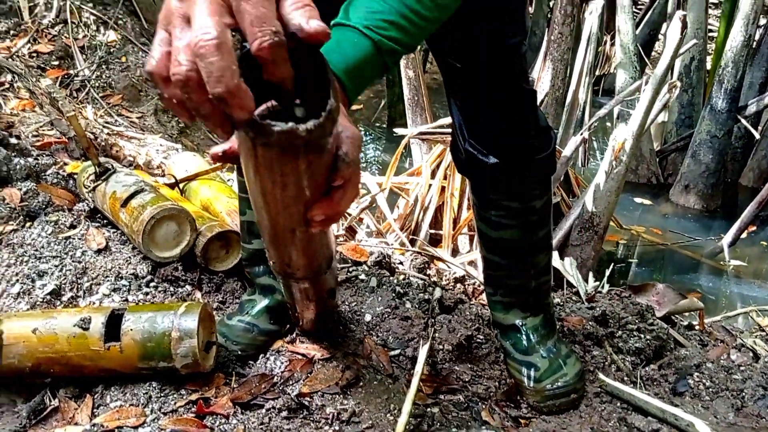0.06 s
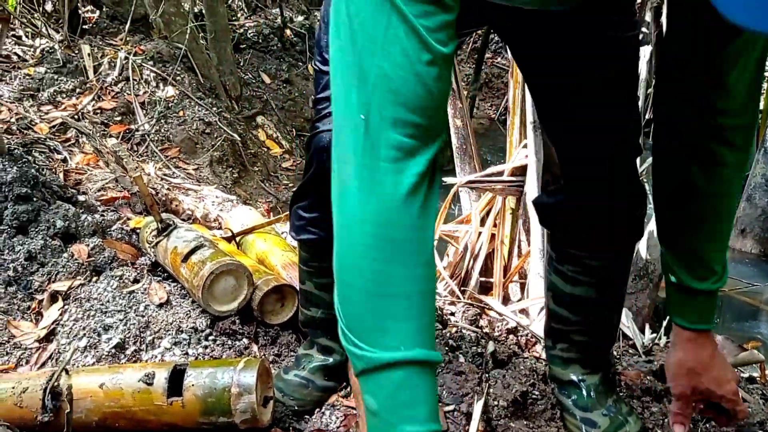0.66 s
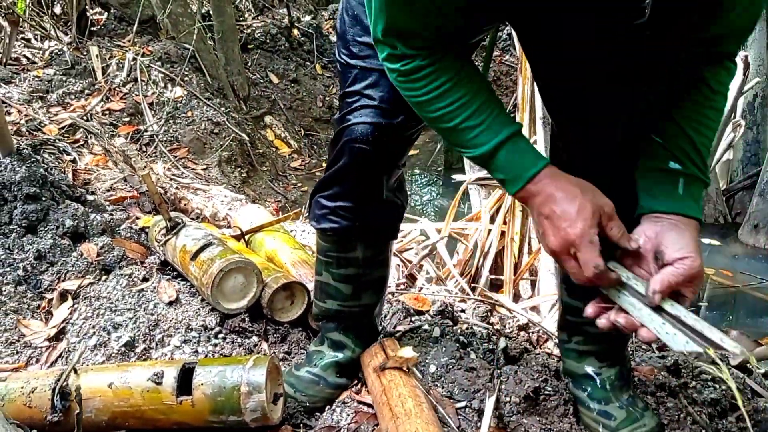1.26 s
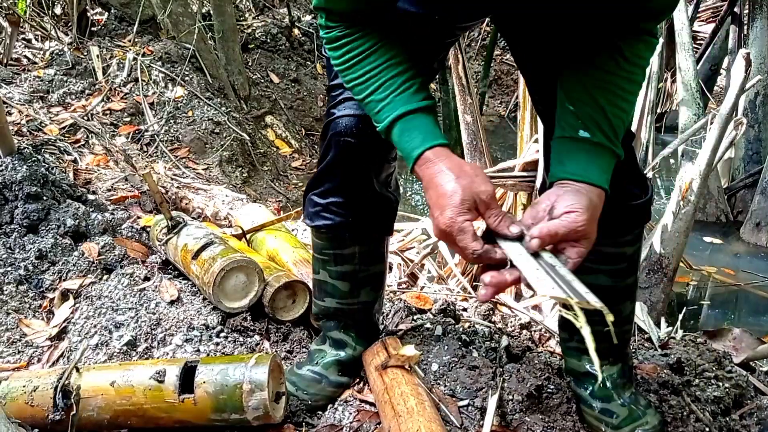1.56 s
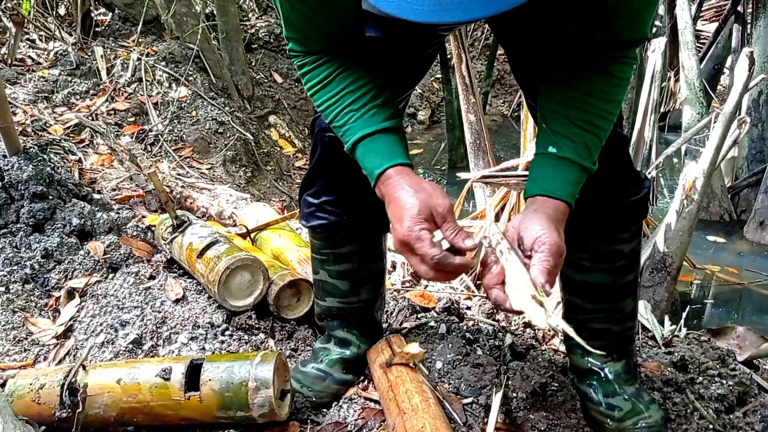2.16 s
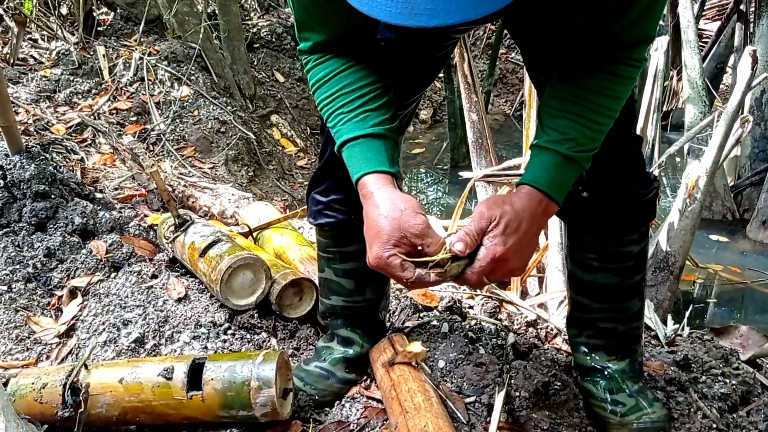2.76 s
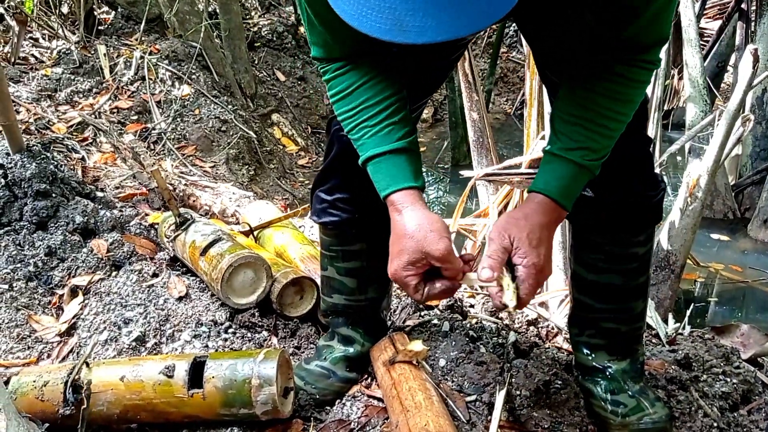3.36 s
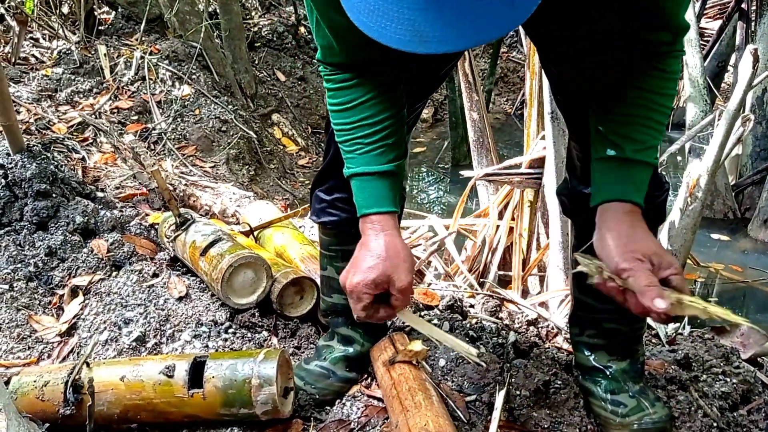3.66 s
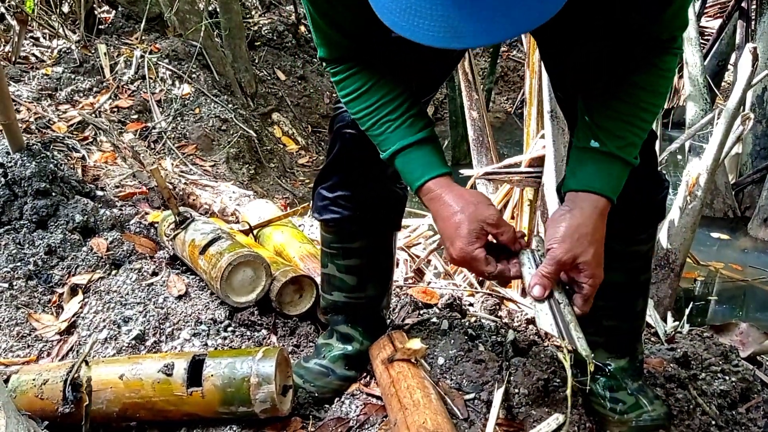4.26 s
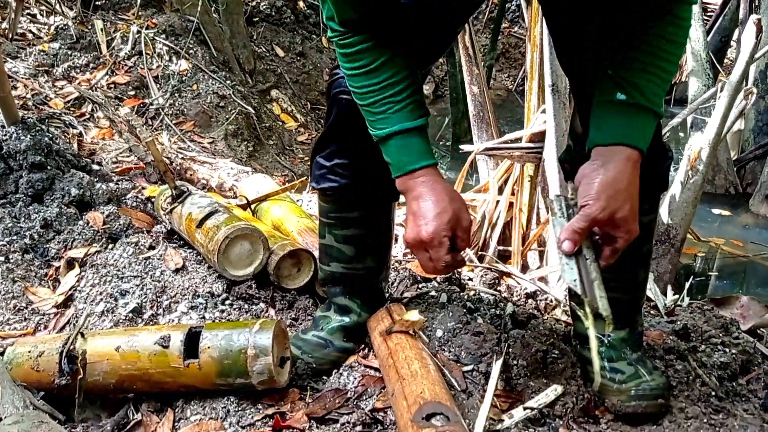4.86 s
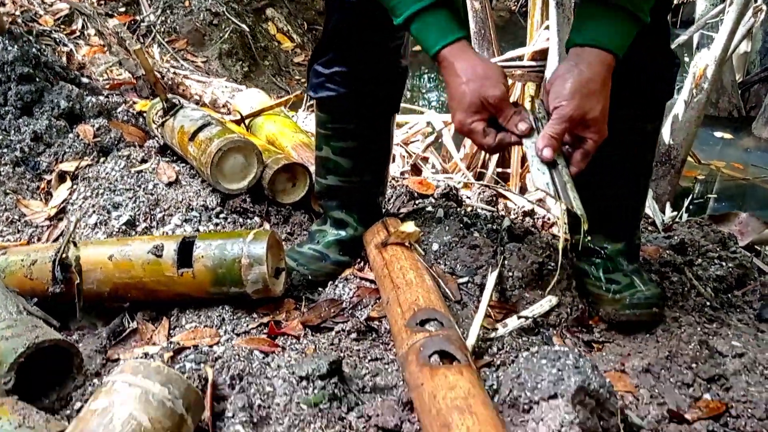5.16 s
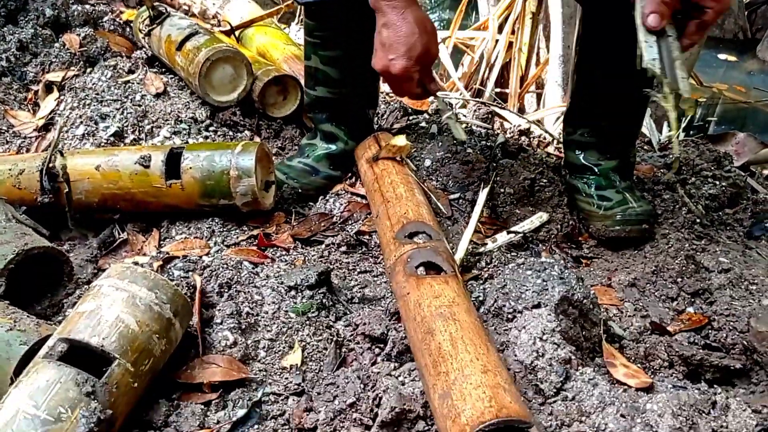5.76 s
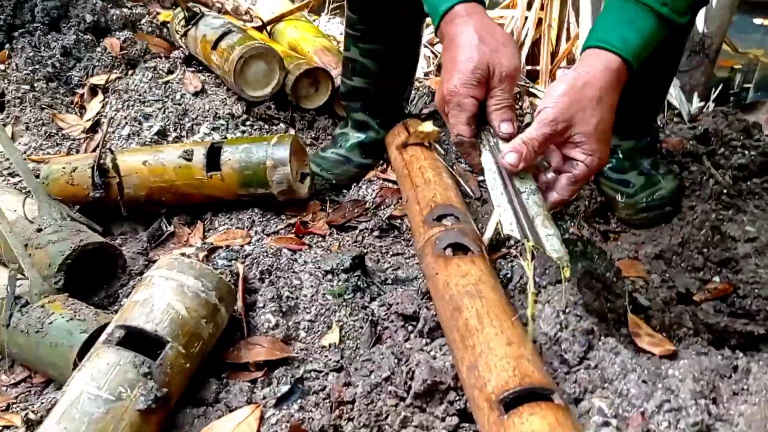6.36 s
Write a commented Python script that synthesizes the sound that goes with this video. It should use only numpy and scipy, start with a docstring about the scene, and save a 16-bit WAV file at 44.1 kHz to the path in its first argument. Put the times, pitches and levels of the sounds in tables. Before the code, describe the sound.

Dry palm-leaf strips rustle, crackle and snap as hands pull them apart close by, with faint distant birds outdoors.

```python
"""Dry palm-leaf strips rustle, crack and tear close to the microphone, on a muddy bank outdoors.
Someone crouched there picks them up, bends them and pulls them apart: fibres break singly (snaps)
and in runs (tears). Sleeves and hands rub, things are knocked and scuffed on the ground, boots shift.
Ground and stems scatter a faint tail; far behind lie a few thin bird calls and a quiet hush."""
import sys
import numpy as np
from scipy import signal
from scipy.io import wavfile
from scipy.ndimage import map_coordinates

SR = 44100
rng = np.random.default_rng(int(sys.argv[2]) if len(sys.argv) > 2 else 0)


def output_pcm(signal):
    """Save a mono or channel-first signal as 16-bit PCM at the path in sys.argv[1].

    Samples are clipped to [-1, 1] before scaling.
    """
    pcm = np.clip(np.atleast_2d(signal).T, -1, 1) * 32767
    wavfile.write(sys.argv[1], SR, np.round(pcm).astype(np.int16))


N = 287091

BINS = np.fft.rfftfreq(4096, 1 / SR) + 1  # f/Hz of every spectrum
# colour of every break and bump near the microphone: f/Hz, level/dB
CLOSE_COLOUR = [(60, -22), (150, -19.5), (300, -8.5), (480, 4), (700, -1), (1100, 4.5), (1800, 1),
                (2600, 2.5), (4000, 0), (6200, 7.5), (9000, 3), (11500, -6.5), (13800, -13), (15300, 3.5)]
# hollow resonances that colour the handling: f/Hz, width/Hz, lift/dB
HOLLOW_MODES = [(502.8, 36, 8.5), (1090.5, 73, 7), (1566, 160, 6), (2376, 94, 5), (3080, 160, 1.5)]
# resonances of a taut strip: f/Hz, width/Hz, lift/dB
STRIP_MODES = [(1103, 70, 5.5), (2120, 510, 5.5), (5080, 260, 5), (6180, 200, -4.5)]


def snaps():
    """Close up, stiff fibres strain and crack, then a thinner one follows; slow breaks click little."""
    # breaks: t/s, level/dB, decay/s (the crack takes 0.45 of it), centre/Hz, fall-off/(dB/octave)
    breaks = [(0.331, -31, 0.0071, 2500, 13), (0.3496, -25.5, 0.0072, 3900, 13),
              (.4935, -30.5, 0.0071, 2500, 6), (1.067, -33, 0.012, 1140, 5.5),
              (1.3125, -29, 0.017, 1610, 7), (1.332, -23.5, 0.0063, 2270, 6),
              (1.4501, -28, 0.0018, 1360, 34), (1.611, -34, 0.014, 2430, 1.5),
              (1.833, -38.5, 0.017, 2270, 6), (1.959, -36.5, 0.0026, 1770, 2),
              (1.98, -30.5, 0.0071, 1880, 9.5), (2.295, -37, 0.019, 2500, 16),
              (2.425, -38.5, 0.0084, 1400, 8.5), (3.045, -20, 0.0025, 4550, 19),
              (3.0498, -19, 0.0016, 4100, 11.5), (3.0623, -20.5, .003, 4930, 55),
              (3.071, -27.5, 0.0049, 5800, 5), (3.188, -30, .006, 5240, 19), (3.208, -34, 0.0032, 5500, -1),
              (3.2224, -29, 0.0053, 5750, -0.5), (3.2444, -21, 0.0053, 5450, 15),
              (3.259, -18, 0.0038, 5100, 37), (3.2956, -18.5, 0.0032, 4870, 0.5),
              (3.3014, -7.5, 0.0036, 3760, 11), (3.349, -29, 0.0022, 4840, -1),
              (3.4904, -33, 0.0064, 4930, 17), (3.525, -32, 0.01, 6230, 5), (3.619, -24.5, 0.01, 3720, 6),
              (3.803, -35, 0.0034, 2620, 51), (3.9651, -30.5, 0.02, 2820, 4),
              (3.9937, -28, 0.0082, 2820, 6), (4.237, -34, 0.0053, 5200, 14),
              (4.2834, -35, 0.005, 4960, 18), (4.401, -25, 0.0073, 3200, 1.5),
              (4.435, -28.5, 0.0044, 4010, 3), (4.487, -29, 0.012, 4370, 3),
              (4.5089, -23.5, 0.0052, 2330, 3.5), (4.5335, -23.5, 0.0051, 4170, 7.5),
              (4.5684, -27.5, 0.0037, 1460, 5), (4.6121, -24.5, 0.0042, 3700, 2),
              (4.7962, -32.5, 0.012, 2630, 23), (4.804, -33.5, 0.0023, 2750, -2),
              (4.8598, -29, .0055, 1630, 6), (5.4203, -19, 0.0006, 3570, 14), (5.478, -30, .003, 9150, 27),
              (5.5618, -20, 0.0012, 11200, 19), (5.669, -28.5, 0.0032, 9100, 2),
              (5.7003, -13, 0.0049, 4000, 5), (5.7062, -12.5, 0.0034, 2040, 1.5),
              (5.7681, -37, 0.03, 3320, 11.5), (5.863, -29.5, 0.0022, 2940, 13),
              (5.9495, -31, 0.0075, 2530, 5.5), (6.1027, -38, 0.0035, 2070, 19),
              (6.285, -32.5, 0.0033, 5360, 15), (6.461, -31.5, 0.0035, 2440, 4)]
    out = np.zeros(N)
    before = np.arange(-round(.02 * SR), 0) / SR
    for s, db, decay, hz, fall_db in breaks:
        strain = gain_of(-21.5) * fibres(len(before), 4000, 5.1) * np.exp(before / 0.0058)
        crack = blow(0.45 * decay, click=np.exp(-decay / 0.0018), per_s=12000, spread_db=-0.5)
        # each splinter has resonances of its own
        splinter_db = np.interp(BINS, np.linspace(0, SR / 2, 90), 4.5 * rng.standard_normal(90))
        tone = hump(hz, fall_db) + 0.23 * peaks(STRIP_MODES) + splinter_db
        add(out, s + before[0], gain_of(db) * colour(np.concatenate([strain, crack]), tone))
        neighbour = blow(decay=0.0017, click=0.42, per_s=7700, spread_db=-3)
        delay_s = 0.018 * rng.uniform(0.33, 1)
        neighbour_db = min(db, -27) - 9  # a thin fibre has only so much strength
        add(out, s + delay_s, gain_of(neighbour_db) * colour(neighbour, tone))
    return out


def tears():
    """A split runs along a taut strip, breaking fibre after fibre."""
    # splits: t/s, length/s, level/dB, centre/Hz, fall-off/(dB/octave)
    splits = [(3.208, 0.0295, -29.5, 5240, 17), (3.259, 0.041, -26, 5900, 7.5),
              (3.404, 0.033, -37, 5000, 11), (3.472, 0.043, -31.5, 4600, 4.5),
              (3.56, 0.025, -30, 6000, 4.5), (3.606, 0.022, -30, 5160, 9.5), (4.572, .026, -39, 2800, 5),
              (4.76, 0.089, -45.5, 5130, 2.5), (5.495, 0.073, -36.5, 2600, 2),
              (5.703, 0.0016, -19.5, 5560, 5), (5.71, 0.03, -38, 2400, -3)]
    # high hiss of the tears, brightened by the microphone's resonance near 15 kHz: f/Hz, lift/dB
    high_hiss = [(6500, 1), (10500, 4), (15300, 10.5)]
    return runs(splits, peaks(STRIP_MODES) + read(high_hiss), per_s=8000, spread_db=1.5,
                jerk_db=0.3, jerk_s=0.0025, build_s=0.0012, fade_s=0.0018)


def effort():
    """Strength of rubbing, drone and rustle: each move swells, holds and lets go, over light contact."""
    # slides of the hands over wood or leaf: t/s, length/s, rubbing/dB, drone/dB, rustle/dB
    moves = [(-.02, 0.05, -39, -53, -40.5), (0.178, 0.11, -45.5, -58, -48.5), (0.33, .15, -48, -50, -44.5),
             (0.472, 0.026, -58, -42.5, -59), (0.546, 0.077, -50.5, -82, -77),
             (0.673, 0.21, -49.5, -72, -46.5), (0.795, 0.081, -49, -77, -41.5),
             (0.869, 0.058, -35, -45, -41.5), (1.018, 0.099, -44, -57, -50),
             (1.107, 0.021, -52, -45, -45.5), (1.169, 0.19, -48.5, -52.5, -51),
             (1.43, 0.15, -51.5, -77, -54), (1.58, 0.045, -44, -52, -44.5), (1.735, 0.026, -67, -53.5, -60),
             (1.827, 0.039, -42.5, -58, -48.5), (1.92, 0.091, -56, -63, -57),
             (2.229, 0.094, -49, -61.5, -50), (2.38, 0.12, -51.5, -56, -56.5),
             (2.752, 0.059, -57, -60, -58), (2.83, 0.055, -46.5, -68, -50.5),
             (2.865, 0.13, -47.5, -47, -48.5), (3.014, 0.1, -68, -77, -46.5),
             (3.168, 0.21, -51, -98, -43.5), (3.415, 0.24, -52.5, -88, -44.5), (3.8, 0.083, -56, -62, -57),
             (4.065, 0.23, -57.5, -63, -56.5), (4.326, 0.1, -54, -63, -50), (4.472, 0.036, -43.5, -54, -48),
             (4.558, 0.18, -61, -64.5, -52), (4.84, 0.022, -50.5, -59.5, -67),
             (5.169, 0.032, -50, -54, -49), (5.307, 0.071, -64, -68, -50.5),
             (5.377, 0.071, -48.5, -50.5, -50), (5.466, 0.058, -61, -50, -40.5),
             (5.669, 0.044, -63, -51.5, -42.5), (5.87, .15, -54, -62, -60), (6.177, 0.052, -51, -61, -55.5),
             (6.343, 0.19, -49.5, -56.5, -51.5)]
    # light finger contact between moves: t/s, level/dB
    contact = [(0, -51), (1.0, -51), (1.4, -55), (1.72, -62), (1.9, -46.5), (2.08, -58.5), (2.4, -54),
               (2.72, -66), (3.1, -54.5), (3.75, -58), (4.7, -57.5), (5.0, -61), (5.28, -63), (5.8, -53),
               (6.1, -58), (6.5, -52)]
    share_db = np.array([-1, -16, -1])  # of that contact in rubbing, drone, rustle
    grip_s, release_s = 0.028, 0.031
    t = np.arange(N) / SR
    contact_db = np.interp(t, *np.transpose(contact))
    power = gain_of(contact_db + share_db[:, None]) ** 2
    for start, length, *db in moves:
        grip = np.clip((t - start) / grip_s, 0, 1)
        release = np.exp(-np.clip(t - start - length, 0, 1) / release_s)
        power += (gain_of(db)[:, None] * grip * release) ** 2
    return np.sqrt(power)


def handling(rub, drone, rustle):
    """A hollow drone, smooth rubbing and a grainy rustle share the small jerks of the hands."""
    # the low, hollow note that rubbing excites: f/Hz, level/dB
    drone_colour = [(150, -33), (300, -18), (400, -7.5), (470, 4), (515, 0.5), (570, -9), (700, -23.5),
                    (1000, -16.5), (3000, -41)]
    # cloth and skin rubbing: f/Hz, level/dB
    rub_colour = [(200, -25), (600, -10), (780, -6.5), (950, 5.5), (1150, 1), (1900, -1.5), (2600, 3.5),
                  (3300, 2.5), (4200, -8.5), (7000, -18), (14000, -53)]
    # dry leaf rustling: f/Hz, level/dB
    rustle_colour = [(300, -49), (1000, -16), (2500, -13), (4000, -4.5), (6500, 2), (8200, -5.5),
                     (10500, -15), (12500, -31.5), (14000, -25), (15300, -19)]
    jerks = wander(N, 0.011)
    drone = drone * evened(fibres(N, 500, 1.25) * gain_of(0.87 * jerks))
    rub = rub * evened(fibres(N, 7000, 1.13) * gain_of(2.76 * jerks))
    rustle = rustle * evened(fibres(N, 9000, 3.9) * gain_of(2.0 * jerks + 1.53 * wander(N, 0.0017)))
    low = colour(drone, read(drone_colour) + peaks(HOLLOW_MODES))[:N]
    middle = colour(rub, read(rub_colour) + peaks(HOLLOW_MODES))[:N]
    middle = shifting(middle, depth_db=5, seconds=.035, width_hz=140)
    high = colour(rustle, read(rustle_colour))[:N]
    high = shifting(high, depth_db=3.4, seconds=.025, width_hz=250)
    return low + middle + high


def ticks(rustle, count=190):
    """Single dry edges catch and flick, each at its own pitch; louder while the leaf is worked."""
    out = np.zeros(N)
    for when, pitch, size in rng.random((count, 3)):
        at, hz = int(when * N), 1800 * 4.5 ** pitch
        flick = blow(decay=0.00095, click=0.4, per_s=4400, spread_db=3.5)
        add(out, at / SR, rustle[at] * gain_of(9.7 * size ** 2) * colour(flick, hump(hz, fall_db=22)))
    return out


def knocks():
    """Hands and wood bump nearby, dull and hardly ringing."""
    # bumps: t/s, level/dB, decay/s, centre/Hz, fall-off/(dB/octave)
    bumps = [(.472, -36, .009, 520, 20), (.501, -29, .0023, 1100, 5), (.917, -27, .0076, 580, 5),
             (1.135, -41, 0.0046, 510, 22), (1.2761, -27.5, 0.0056, 1390, 21),
             (1.2882, -32.5, 0.0054, 1250, 35), (2.948, -34, 0.0057, 510, 26),
             (3.456, -32, 0.0062, 637, 12), (3.4667, -22.5, 0.0051, 1240, 10),
             (4.402, -31, 0.0065, 1110, 25), (4.863, -40, .0025, 497, 18),
             (5.7329, -20.5, 0.0022, 750, 3.5)]
    out = np.zeros(N)
    for s, db, decay, hz, fall_db in bumps:
        bump = blow(decay, click=.9, per_s=6000, spread_db=1)
        add(out, s, gain_of(db) * colour(bump, hump(hz, fall_db)))
    return out


def scuffs():
    """Hands, wood and strips catch and slip as they are dragged."""
    # drags: t/s, length/s, level/dB, centre/Hz, fall-off/(dB/octave)
    drags = [(0, 0.09, -44, 1280, 4.5), (.33, .03, -35.5, 2340, 8), (.365, 0.089, -42.5, 530, -3.5),
             (.85, .05, -34.5, 2030, 2), (.9, 0.038, -34, 670, 5), (1.29, 0.056, -35.5, 1300, 6),
             (2.162, 0.025, -45, 2820, 13.5), (2.934, 0.023, -36.5, 930, 4.5),
             (4.18, .015, -50.5, 1450, 28), (5.689, 0.0039, -40, 760, 20), (6.09, 0.019, -51.5, 1290, 17)]
    return runs(drags, peaks(HOLLOW_MODES) / 2, per_s=7900, spread_db=1.5,
                jerk_db=2.2, jerk_s=0.00534, build_s=0.0013, fade_s=0.0053)


def boots():
    """Boots shift in the mud of the bank, low and faint."""
    # shifts of the feet: t/s, length/s, level/dB, centre/Hz, fall-off/(dB/octave)
    steps = [(4.864, 0.02, -49, 370, 12), (5.12, .12, -60.5, 356, 30), (5.32, 0.034, -61, 324, 38)]
    return runs(steps, body_db=0, per_s=1600, spread_db=5.0,
                jerk_db=-0.5, jerk_s=0.0072, build_s=0.0082, fade_s=.008)


def thicket(x, t60=0.15, wet_db=-12):
    """Ground and stems scatter a short, faint tail back to the microphone."""
    t = np.arange(SR // 2) / SR
    taps = fibres(len(t), 4000, 0.9) * gain_of(-60 * t / t60) * (t > .003)
    return gain_of(wet_db) * signal.fftconvolve(x, taps / np.linalg.norm(taps))[:N]


def birds():
    """Gliding whistles, blurred by distance into narrow bands."""
    # calls: start/s, end/s, level/dB, first f/Hz, middle f/Hz, last f/Hz, width/Hz
    calls = [(2.018, 2.16, -56, 4970, 4880, 4780, 480), (3.723, 3.999, -52.5, 7300, 7850, 8200, 1530),
             (3.962, 4.248, -55, 7700, 8100, 7800, 1500), (4.25, 4.376, -57, 5000, 4670, 4500, 600),
             (5.962, 6.143, -57.5, 5130, 4810, 4780, 650), (6.277, 6.474, -56.5, 7230, 7340, 7300, 1500)]
    out = np.zeros(N)
    for start, end, db, first_hz, middle_hz, last_hz, width in calls:
        progress = np.linspace(0, 1, round((end - start) * SR))
        hz = np.interp(progress, [0, .5, 1], [first_hz, middle_hz, last_hz])
        noise = rng.standard_normal(SR) + 1j * rng.standard_normal(SR)
        blur = signal.sosfilt(signal.butter(3, width / 2, fs=SR, output="sos"), noise)[:len(hz)]
        call = (blur * np.exp(2j * np.pi * np.cumsum(hz) / SR)).real
        add(out, start, gain_of(db) * evened(call) * signal.windows.tukey(len(hz), .4))
    return out


def hush(level_db=-62.5):
    """Far-off air with a low rumble, drifting slightly in level."""
    # outdoor air: f/Hz, relative level/dB
    air_colour = [(25, -12), (55, -1), (95, 5.5), (150, 2), (260, -5), (480, -5.5), (750, -11.5),
                  (1400, -25), (2000, -25), (3000, -11), (4500, -26), (6500, -26), (10000, -62),
                  (15000, -55)]
    tone = read(air_colour) + 0.32 * peaks(HOLLOW_MODES)
    air = colour(rng.standard_normal(N + SR), tone)[SR:SR + N]
    drift = gain_of(1.3 * wander(N, 0.12))
    return gain_of(level_db) * drift * evened(air)


def fibres(length, per_s, spread_db):
    """Tiny fractures at random moments, uneven in size, at rms 1."""
    breaking = rng.random(length) < per_s / SR
    size = np.minimum(rng.exponential(1, length), 4)
    sign = rng.choice([-1, 1], length)
    return evened(breaking * sign * gain_of(spread_db * size))


def blow(decay, click, per_s, spread_db):
    """One sharp release, then a dying flurry of small ones."""
    t = np.arange(round(.04 * SR)) / SR
    fade = np.exp(-t / max(decay, 5e-4))
    flurry = fibres(len(t), per_s, spread_db) * fade * (1 - np.exp(-t / .0003))
    flurry /= np.linalg.norm(flurry) + 1e-12
    flurry[0] += click
    return flurry * np.linalg.norm(fade) / np.linalg.norm(flurry)


def runs(rows, body_db, per_s, spread_db, jerk_db, jerk_s, build_s, fade_s):
    """Runs of tiny slips or breaks; the pull builds, catches and lets go as it travels, then fades."""
    out = np.zeros(N)
    t = np.arange(SR // 4) / SR - .03
    for start, length, db, hz, fall_db in rows:
        pull = np.exp(np.minimum(t, 0) / build_s - np.maximum(t - length, 0) / fade_s)
        grains = pull * fibres(len(t), per_s, spread_db) * gain_of(jerk_db * wander(len(t), jerk_s))
        grains *= np.linalg.norm(pull) / np.linalg.norm(grains)
        add(out, start + t[0], gain_of(db) * colour(grains, hump(hz, fall_db) + body_db))
    return out


def shifting(x, depth_db, seconds, width_hz):
    """As the grip moves, narrow resonances of the leaf come and go."""
    hz, t, spectra = signal.stft(x, SR, nperseg=512)
    grid = np.meshgrid(hz / width_hz, t / seconds, indexing="ij")
    field = map_coordinates(rng.standard_normal((300, 700)), grid, order=1, mode="wrap")
    gain = evened(gain_of(depth_db * np.clip(evened(field), -2, 2)))
    return signal.istft(spectra * gain, SR, nperseg=512)[1][:len(x)]


def hump(hz, fall_db):
    """dB spectrum of a piece of leaf or wood, which radiates best around its own frequency."""
    octaves = np.log2(BINS / hz)
    loss_db = max(fall_db, 0) * np.hypot(octaves, .4) + 0.22 * octaves ** 2
    return read(CLOSE_COLOUR) + 0.43 * peaks(HOLLOW_MODES) - loss_db


def peaks(resonances):
    """Resonances as a dB spectrum."""
    return sum(db / (1 + (2 * (BINS - hz) / width) ** 2) for hz, width, db in resonances)


def read(points):
    """A dB spectrum on BINS, joined on a log-frequency axis."""
    hz, db = np.transpose(points)
    return np.interp(np.log(BINS), np.log(hz), db)


def colour(x, db):
    """Minimum-phase filter of unit energy, shaped by a dB spectrum."""
    log_gain = np.log(gain_of(np.maximum(db - db.max(), -100)))
    mirrored = np.concatenate([log_gain, log_gain[-2:0:-1]])
    ring = np.fft.ifft(np.exp(np.conj(signal.hilbert(mirrored)))).real[:2048]
    return signal.fftconvolve(x, ring / np.linalg.norm(ring))


def wander(length, seconds):
    """Random drift of rms 1 that changes about once in the given time."""
    at = np.arange(length) / (SR * max(seconds, 1e-4))
    return evened(np.interp(at, np.arange(length), rng.standard_normal(length)))


def gain_of(db):
    """Decibels to amplitude."""
    return 10 ** (np.asarray(db) / 20)


def evened(x):
    """Scales to rms 1."""
    return x / np.sqrt(np.mean(x ** 2) + 1e-20)


def add(mix, s, sound):
    """Adds a sound into the mix at time s."""
    part = mix[max(round(s * SR), 0):][:len(sound)]
    part += sound[:len(part)]


def scene():
    """One microphone on the bank: the work close by, its scatter, and distant birds and air."""
    pulled = tears() + scuffs()
    feet = boots()
    dragged = shifting(pulled, depth_db=3.5, seconds=.025, width_hz=150)
    rub, drone, rustle = effort()
    close = snaps() + ticks(rustle) + knocks() + dragged + handling(rub, drone, rustle) + feet
    return (close + thicket(close) + birds() + hush())[None]


def record(dry):
    """The recorder's band limit."""
    edge_hz = 15900
    low_pass = signal.firwin(401, edge_hz, window=("kaiser", 8), fs=SR)
    return signal.oaconvolve(dry, low_pass[None], "same")


dry = scene()
out = record(dry)
output_pcm(out)
```